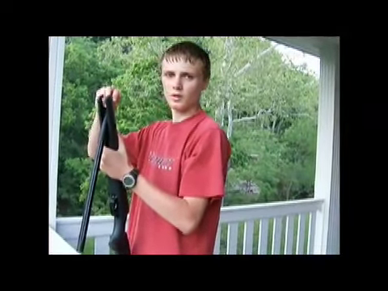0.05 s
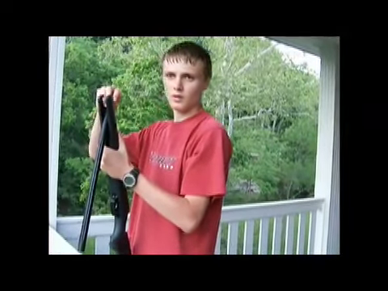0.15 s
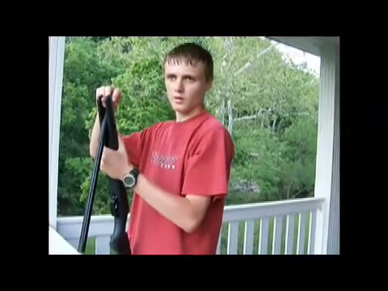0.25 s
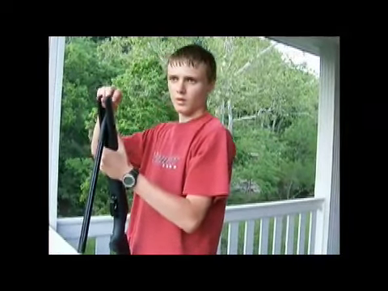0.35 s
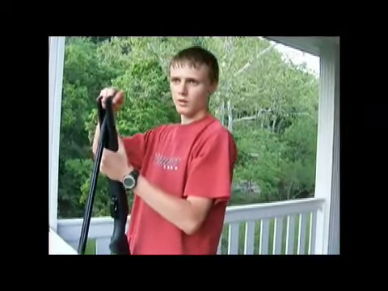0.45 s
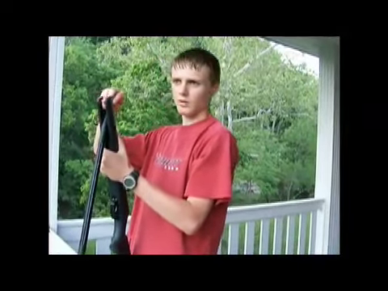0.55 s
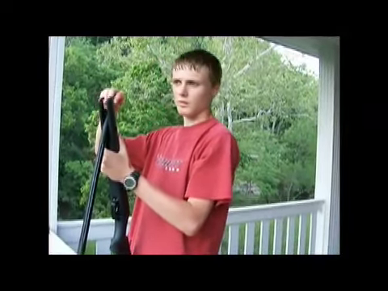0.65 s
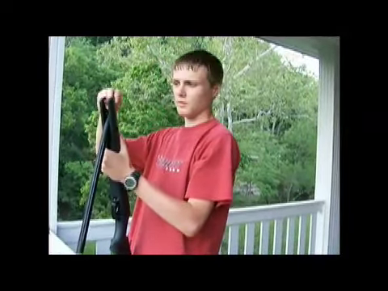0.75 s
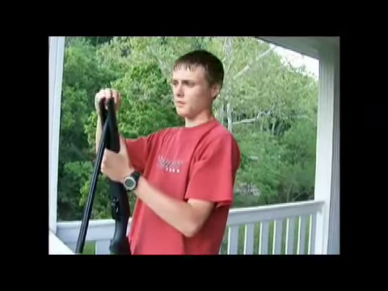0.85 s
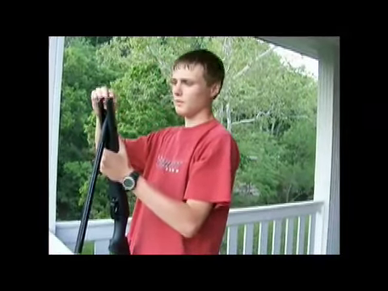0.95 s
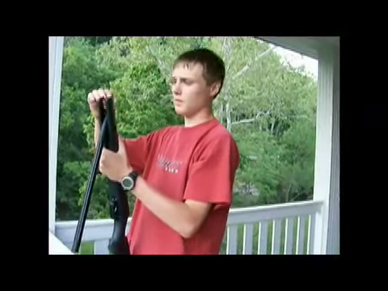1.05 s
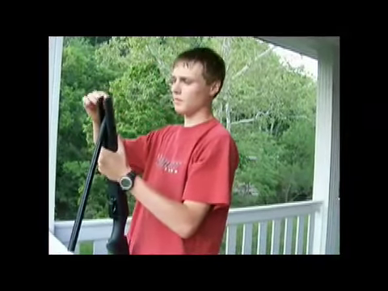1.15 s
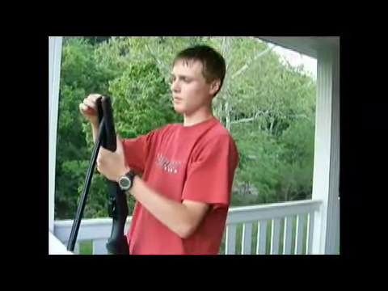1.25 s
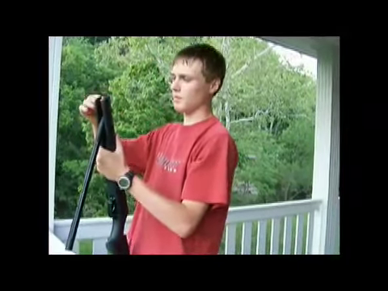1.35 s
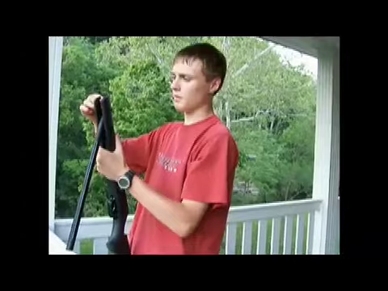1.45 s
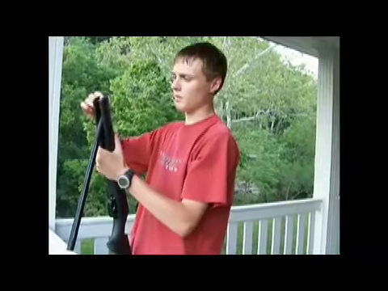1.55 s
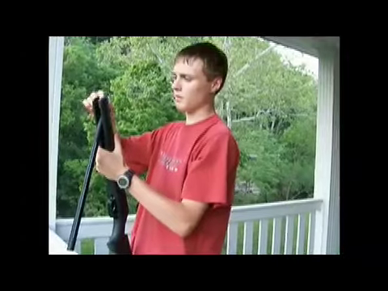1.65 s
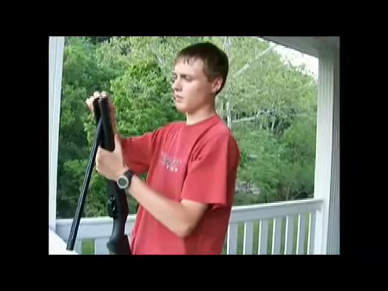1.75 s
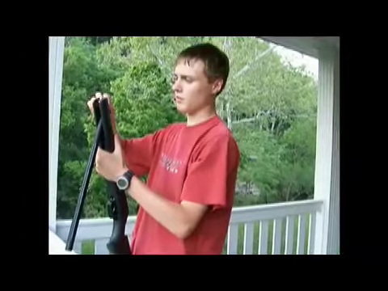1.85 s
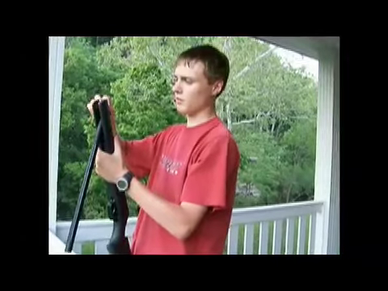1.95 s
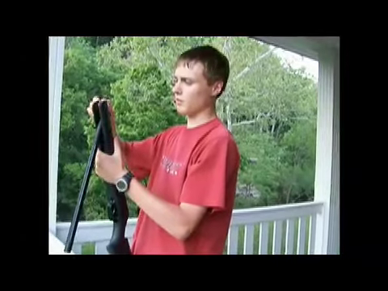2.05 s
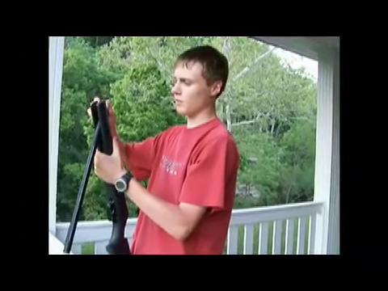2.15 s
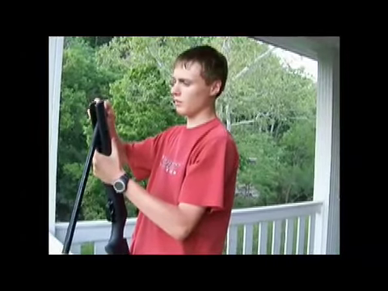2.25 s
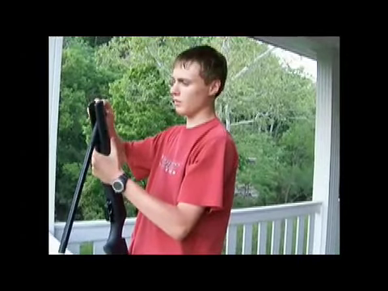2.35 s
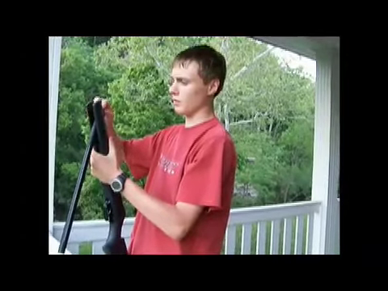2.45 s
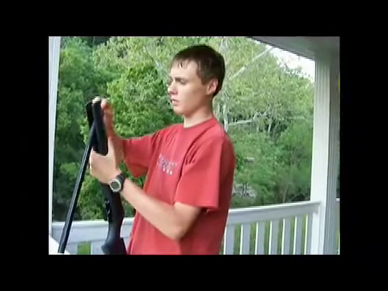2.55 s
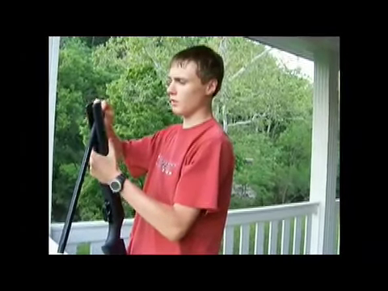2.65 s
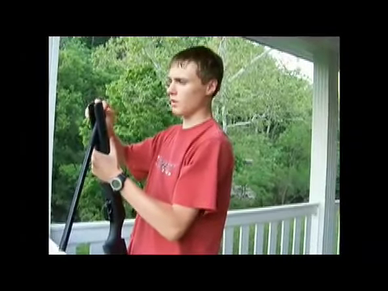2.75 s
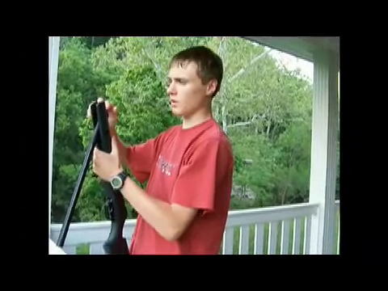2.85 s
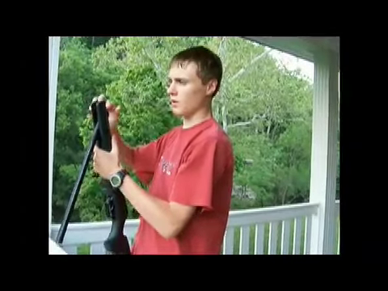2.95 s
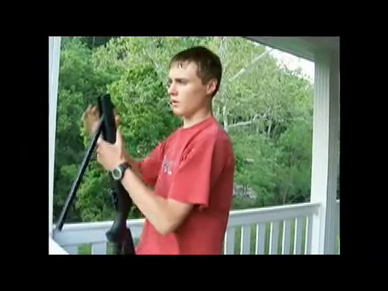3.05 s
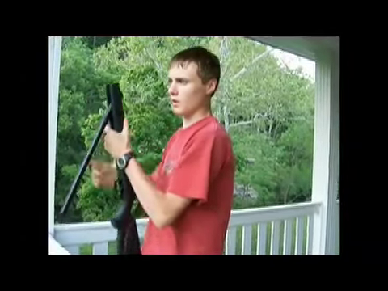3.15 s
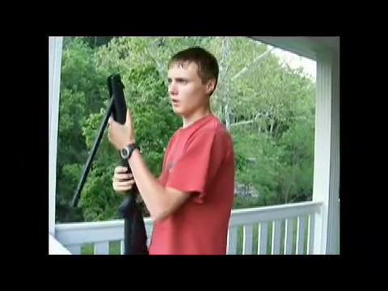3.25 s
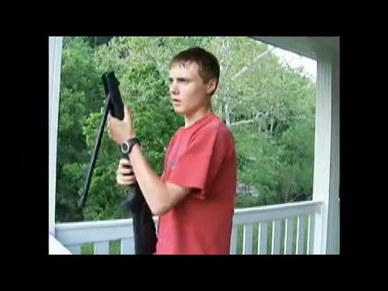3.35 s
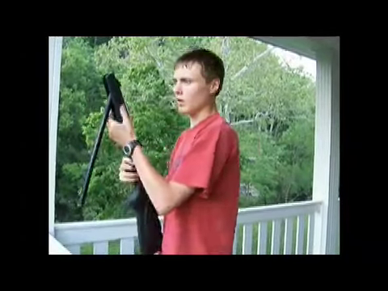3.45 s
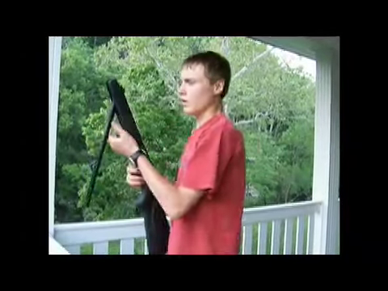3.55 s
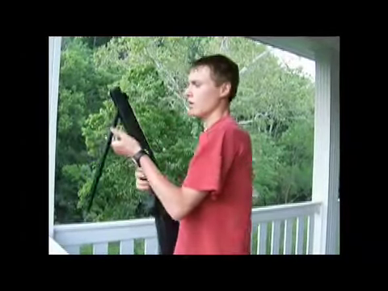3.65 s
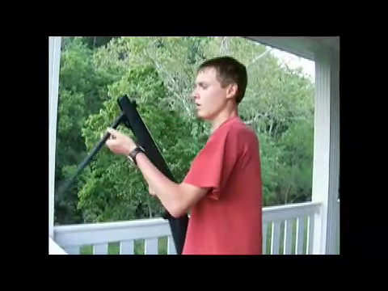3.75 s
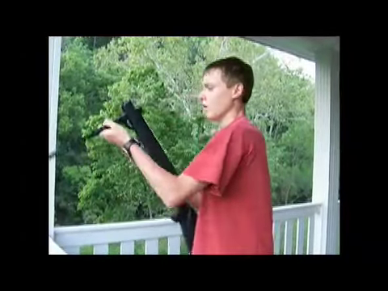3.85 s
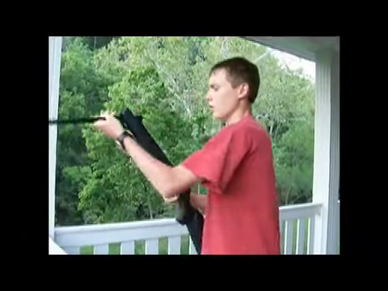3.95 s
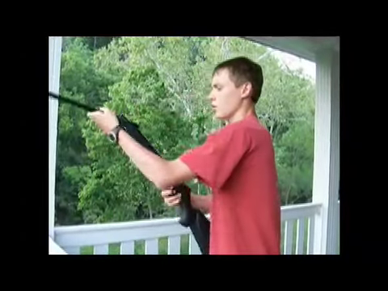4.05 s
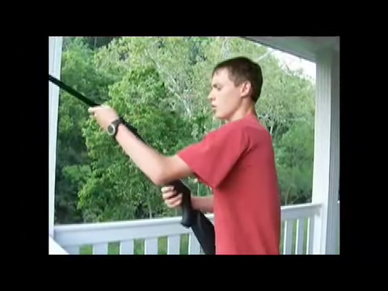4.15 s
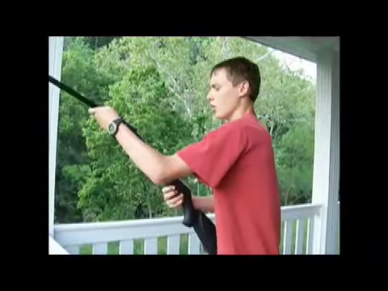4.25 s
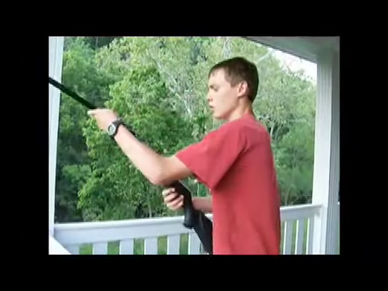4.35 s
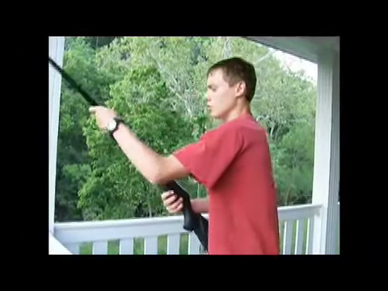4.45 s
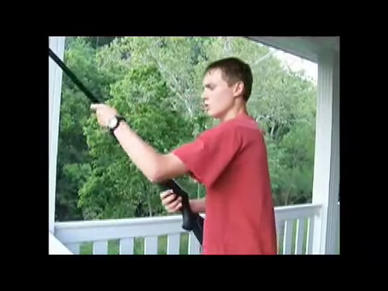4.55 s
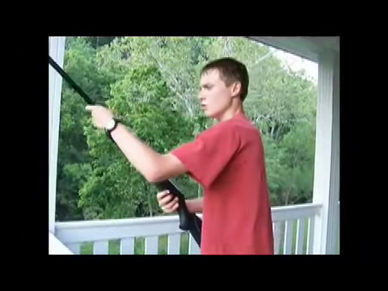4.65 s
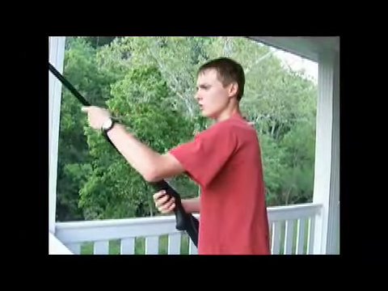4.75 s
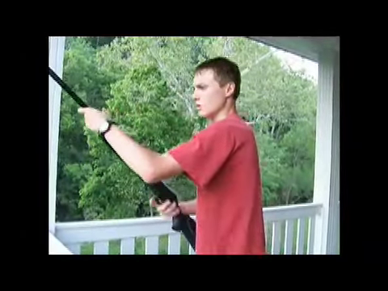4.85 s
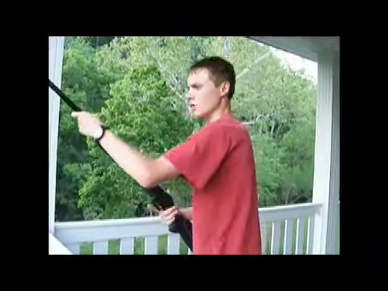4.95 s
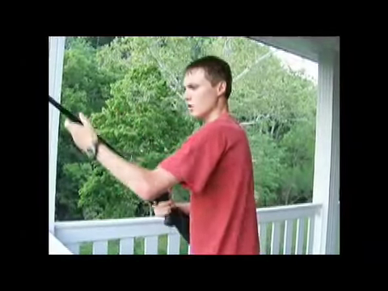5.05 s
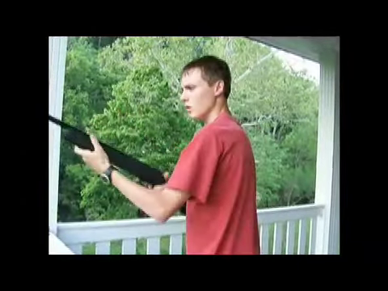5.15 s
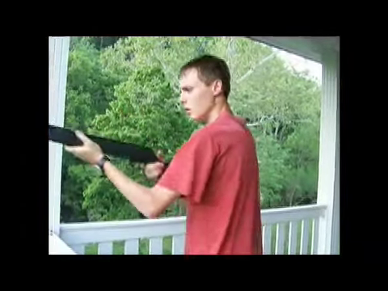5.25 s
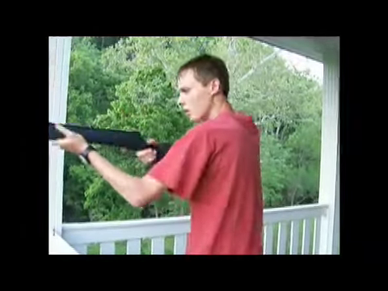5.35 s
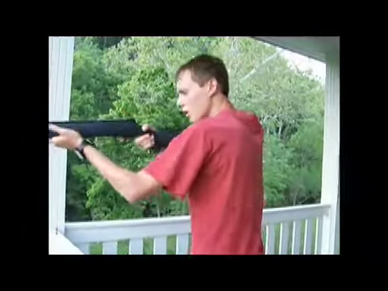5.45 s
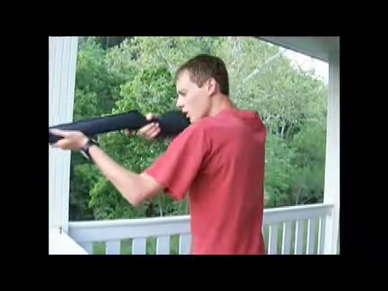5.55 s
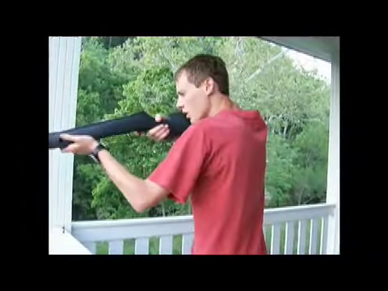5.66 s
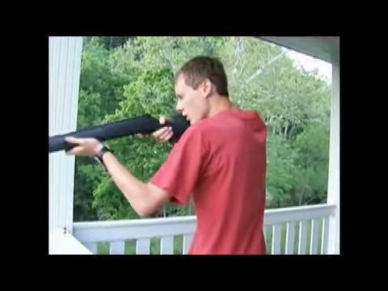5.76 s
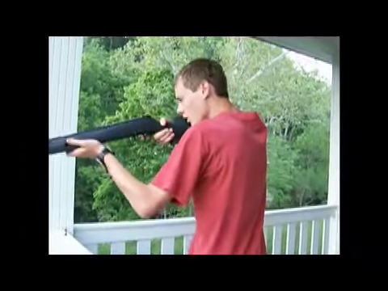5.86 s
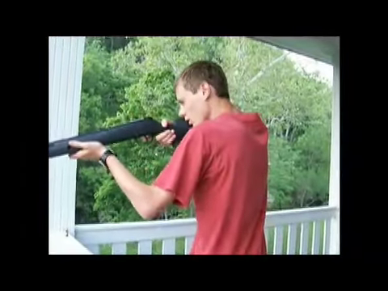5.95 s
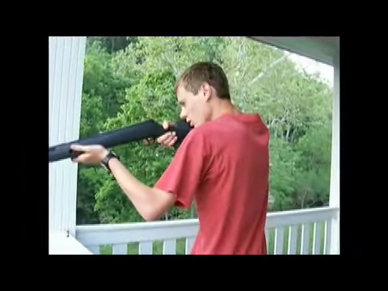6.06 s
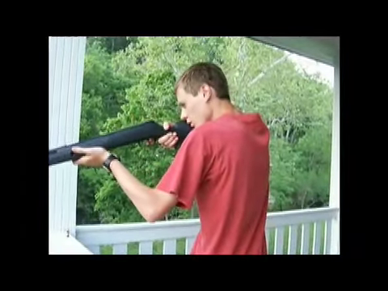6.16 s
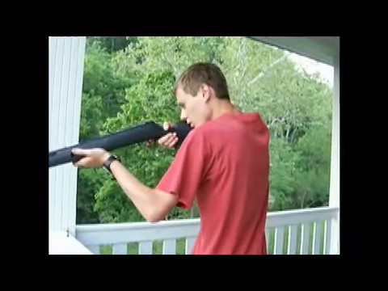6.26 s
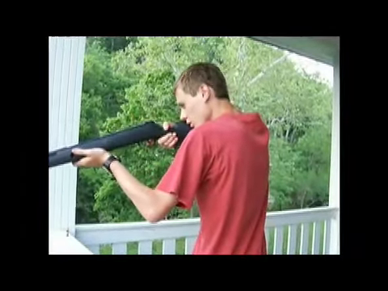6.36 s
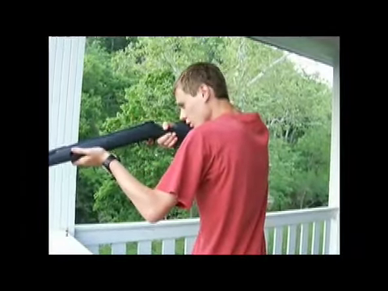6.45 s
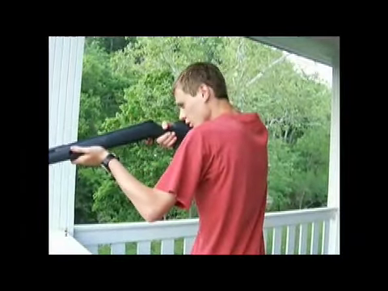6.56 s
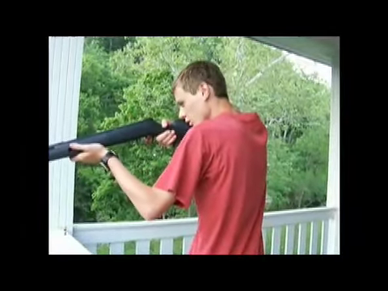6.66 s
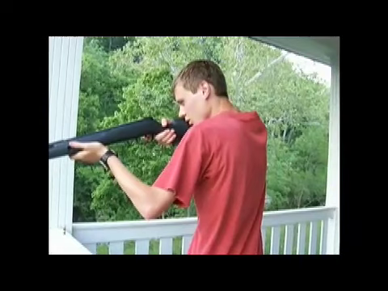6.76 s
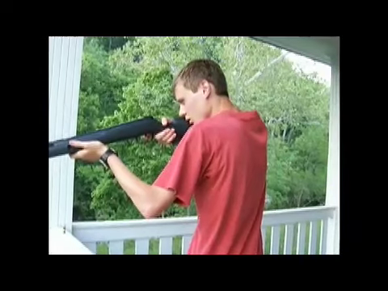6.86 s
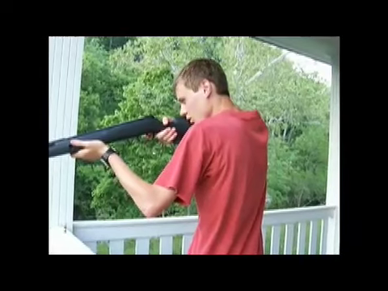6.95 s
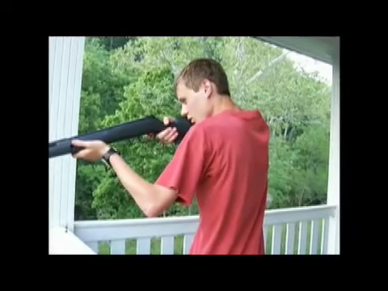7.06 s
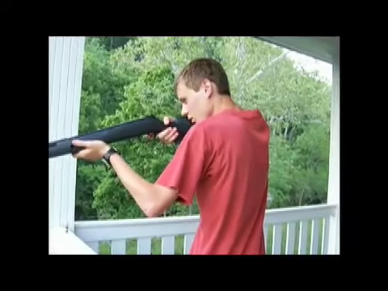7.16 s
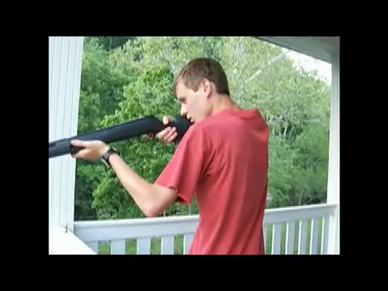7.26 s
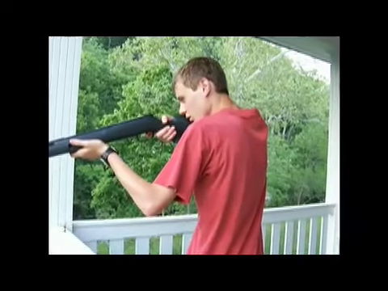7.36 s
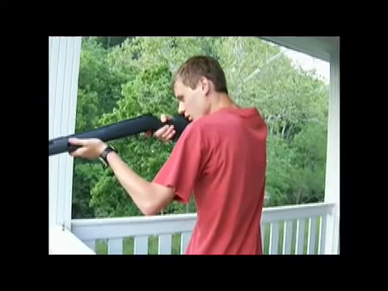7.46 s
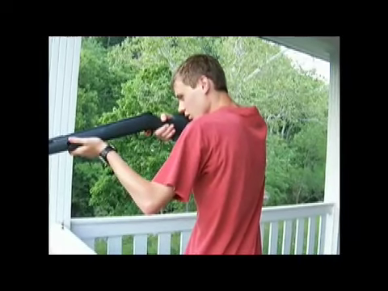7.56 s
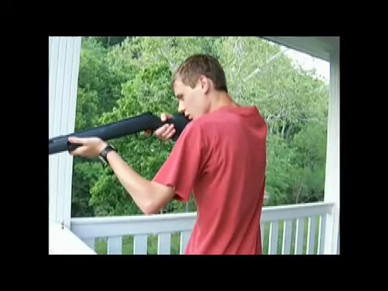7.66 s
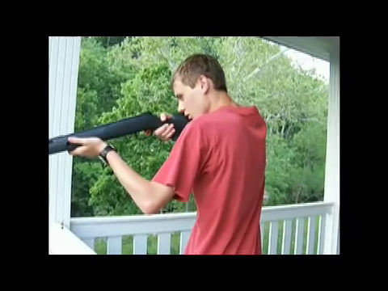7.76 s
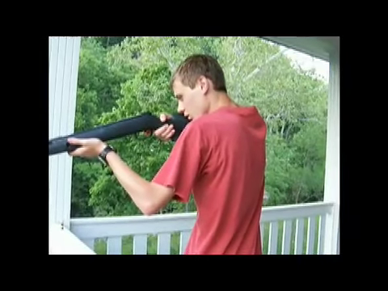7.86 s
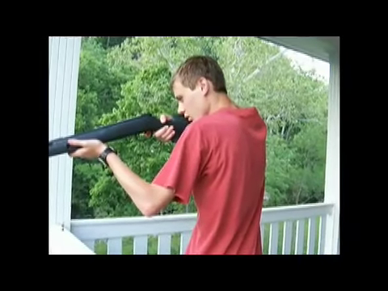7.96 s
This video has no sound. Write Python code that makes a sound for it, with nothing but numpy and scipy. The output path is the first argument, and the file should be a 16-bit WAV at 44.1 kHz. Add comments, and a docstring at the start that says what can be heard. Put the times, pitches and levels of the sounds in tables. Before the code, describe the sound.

A quiet leafy porch, heard by a small stereo microphone near the rifle: far traffic rumble, leaf hiss, a wavering low motor drone slowly sinking, faint hum and thin whines. A blurred bird whistle opens; an insect chirrs about three times a second, in bouts until 3.6 s. Light steel ticks come at 0.9 and 1.6-1.9 s, with soft hand rubbing. Firmer clacks fall at 2.9 and 3.0 s, with a dull stock knock. From 3.5 to 3.9 s, knocks, crowded clicks and rough steel grinding make a rattling cocking stroke; a shorter scrape follows at 4.0. At 4.4 s a huge, dry metallic snap overloads, leaving a bright spring shiver under half a second. The background ducks, with faint ticks, a shirt rustle and knock at 5.0 and soft wind buffets around 5-6. It recovers from about 6 s; chirring returns at 6.6, with bird whistles, clearest at the end.

```python
"""Air rifle on a porch

A break-barrel air rifle is loaded, cocked and snapped shut on a porch among trees.
Steel parts click (short noise cracks and ringing tones) and grind; hand and shirt rub (tiny random slips).
An insect chirrs (narrow noise) and birds whistle (gliding sines). Far traffic, leaves and wind are filtered
noise; a motor and a hum are wavering tones, with faint whines.
The snap makes the recorder's gain control duck everything for about two seconds."""
import sys
import numpy as np
from scipy import signal
from scipy.fft import rfft, irfft, next_fast_len
from scipy.io import wavfile
from scipy.ndimage import uniform_filter1d, minimum_filter1d

SR = 44100
rng = np.random.default_rng(int(sys.argv[2]) if len(sys.argv) > 2 else 0)


def bounce(signal):
    """Save signal as a 16-bit WAV file at the path given by the first command-line argument."""
    frames = np.transpose(np.atleast_2d(signal))
    limited = np.clip(frames, -1, 1)
    pcm = np.round(limited * 32767).astype(np.int16)
    wavfile.write(sys.argv[1], SR, pcm)


N = 352623   # length of the scene in samples
TIME = np.arange(N) / SR
SIZE = next_fast_len(N + SR, True)   # filtering length, with a spare second so that nothing wraps round
BINS_HZ = np.maximum(np.arange(SIZE // 2 + 1) * SR / SIZE, 1)


def from_db(db):
    """Turn decibels into a gain."""
    return 10 ** (np.asarray(db) / 20)


def rms_one(x):
    """Scale to an average strength (rms) of 1."""
    return x / np.sqrt(np.mean(x ** 2) + 1e-20)


def level(rows):
    """Gain over time, gliding between (time [s], level [dB]) points."""
    return from_db(np.interp(TIME, *np.transpose(rows)))


def swells(rows):
    """Gain over time from bell-shaped swells: (middle [s], half length [s], level [dB])."""
    gain = np.zeros(N)
    for middle, half_length, db in rows:
        edges = [middle - 4 * half_length, middle + 4 * half_length]
        near = slice(*np.searchsorted(TIME, edges))
        gain[near] += from_db(db) * np.exp(-np.square((TIME[near] - middle) / half_length))
    return gain


def drift(width_hz):
    """Random wandering, mostly slower than this rate; rms 1."""
    count = 2 ** 14   # coarse points, later joined by straight lines
    hz = np.arange(count // 2 + 1) * SR / N
    slow = irfft(rfft(rng.standard_normal(count)) / (1 + (hz / width_hz) ** 2))
    return np.interp(np.arange(N) * count / N, np.arange(count), rms_one(slow))


def over_hz(rows):
    """Spread each column of a frequency table over all frequencies, evenly in pitch."""
    hz, *columns = np.transpose(rows)
    return [np.interp(np.log(BINS_HZ), np.log(hz), column) for column in columns]


def causal(gain):
    """Minimum-phase filter with these gains: nothing sounds before its cause."""
    cepstrum = irfft(np.log(gain), SIZE)
    # Fold the second half of the cepstrum onto the first.
    fold = (1 + np.sign(np.arange(SIZE))) * (np.arange(SIZE) < SIZE // 2)
    return np.exp(rfft(cepstrum * fold))


def colour(spectrum):
    """Causal filter with this spectrum and an average power gain of 1."""
    return causal(rms_one(from_db(over_hz(spectrum)[0])))


def filtered(x, response):
    """Apply a frequency response."""
    return irfft(rfft(x, SIZE) * response, SIZE)[..., :N]


def narrow_noise(hz, width_hz):
    """Noise gathered round one frequency; rms 1."""
    gain = 1 / (1 + ((BINS_HZ - hz) / width_hz) ** 2)
    return rms_one(filtered(rng.standard_normal(SIZE), gain))


def whistle(hz):
    """A sine that follows a pitch curve."""
    return np.sin(2 * np.pi * np.cumsum(hz) / SR)


def wavering_tone(hz, wander_hz, waver_db):
    """A tone whose pitch and level wander; rms 1."""
    tone = whistle(hz + wander_hz * drift(11.8))
    return rms_one(tone * from_db(waver_db * drift(5.4)))


def friction(slips_per_s, spread_db, smooth_share):
    """Rubbing surfaces: tiny slips of uneven size over a smooth hiss; rms 1."""
    slips = (rng.random(N) < slips_per_s / SR) * rng.choice([-1, 1], N)
    sizes = from_db(spread_db * np.minimum(rng.exponential(1, N), 3))
    return rms_one(rms_one(slips * sizes) + smooth_share * rng.standard_normal(N))


def struck(modes, spread_db):
    """A blow sets off fading tones, each with a random strength."""
    t = TIME[:SR // 2]
    strengths = from_db(spread_db * rng.standard_normal(len(modes)))
    strengths = strengths * rng.choice([-1, 1], len(modes))
    return sum(strength * from_db(db - 60 * t / t60) * np.sin(2 * np.pi * hz * t)
               for strength, (hz, db, t60) in zip(strengths, modes))


def add(track, s, sound):
    """Mix a sound into a track at a time in seconds."""
    start = int(np.clip(round(s * SR), 0, N))
    track[start:start + len(sound)] += sound[:N - start]


def tail(x, t60, low_hz):
    """Dense scattered reflections, different on each side and thin in the bass."""
    t = TIME[:SR]
    fading = from_db(-60 * t / t60) * np.minimum(t / .008, 1)   # builds up over 8 ms
    response = rms_one(rng.standard_normal((2, SR)) * fading) / np.sqrt(SR)
    bass_cut = BINS_HZ / (BINS_HZ - 1j * low_hz)
    return filtered(x, rfft(response, SIZE) * bass_cut)


def diffuse(spectrum):
    """Stereo noise from all around, more alike in both channels in the bass."""
    # left-right likeness of the surroundings: (frequency [Hz], likeness [0-1])
    likeness = [(25, .4), (70, .88), (160, .97), (500, .82), (1000, .72), (1800, .56), (2500, .18),
                (6000, .2)]
    alike = np.clip(over_hz(likeness)[0], 0, 1)
    shares = np.sqrt([(1 + alike) / 2, (1 - alike) / 2])
    mid, side = filtered(rng.standard_normal((2, N)), colour(spectrum) * shares)
    return np.array([mid + side, mid - side])


def traffic():
    """Far traffic: a rumble of low noise from all around."""
    # (time [s], level [dB])
    traffic_level = [(0, -36), (0.7, -34), (1.5, -36), (4.5, -39.5), (8, -37)]
    # (frequency [Hz], level per Hz [dB])
    traffic_spectrum = [(10, -6), (25, -3), (45, -6), (80, -2), (130, 0), (190, -0.5), (260, -3), (330, -9),
                        (480, -12.5), (1000, -37.5), (4000, -44.5), (9000, -69)]
    return level(traffic_level) * diffuse(traffic_spectrum)


def leaves():
    """Leaves and air: a hiss from all around."""
    # (time [s], level [dB])
    air_level = [(0, -38.5), (1.3, -37.5), (2.6, -40), (3.5, -36.5), (4.5, -40), (6.7, -37.5), (7.4, -39.5)]
    # (frequency [Hz], level per Hz [dB])
    air_spectrum = [(60, 2), (400, 0), (600, 2.5), (820, 4), (1150, -0.5), (1500, -3.5), (2000, -8),
                    (2800, -8.5), (3500, -13.5), (4300, -14), (5000, -9.5), (6200, -17.5), (7300, -16),
                    (9000, -47)]
    return level(air_level) * diffuse(air_spectrum)


def motor():
    """A far motor slowly loses speed; its wavering tones share one falling pitch curve."""
    # main tone: (time [s], pitch [Hz], level [dB])
    drone_path = [(0, 169, -38.5), (0.45, 165, -42), (0.7, 165, -39), (1.05, 164, -46), (1.3, 164, -32),
                  (1.5, 162, -36.5), (2.15, 161, -33.5), (2.36, 159, -45), (2.95, 160, -33),
                  (3.22, 161, -46.5), (3.4, 160, -38), (3.8, 160, -35.5), (4.4, 157, -43), (5.1, 157, -38),
                  (5.8, 155, -40), (7.15, 156, -39), (8, 153, -46.5)]
    # tones: (pitch ratio to the main tone, level against it [dB], pitch wander [Hz])
    motor_tones = [(0.785, -10.5, 3.5), (1, 0, 1.22), (1.57, -12, 5)]
    drone_s, drone_hz, drone_db = np.transpose(drone_path)
    pitch = np.interp(TIME, drone_s, drone_hz)
    tones = sum(from_db(db) * wavering_tone(ratio * pitch, wander, waver_db=2.5)
                for ratio, db, wander in motor_tones)
    return from_db(np.interp(TIME, drone_s, drone_db)) * tones


def hum():
    """A low hum of steady pitch: a tone and a weaker one an octave above."""
    hum_hz, octave_db = 99.76, -6
    # (time [s], level [dB])
    hum_level = [(0, -46.5), (1.45, -40), (2.2, -51.5), (3.35, -41.5), (4.2, -50.5), (5.3, -51.5),
                 (6.1, -41), (7.1, -45.5)]
    low = wavering_tone(hum_hz, .4, waver_db=0.0)
    octave = wavering_tone(2 * hum_hz, .8, waver_db=1.5)
    return level(hum_level) * (low + from_db(octave_db) * octave)


def whines():
    """Thin whines: steady narrow noises, and one tone that swells and fades."""
    # steady whines: (frequency [Hz], level [dB], width [Hz])
    steady_whines = [(738.5, -52, 4.4), (840, -63, 4.1), (5860, -67, 17), (5980, -71.5, 20),
                     (5850, -67.5, 15)]
    # swells of the tone: (middle [s], half length [s], level [dB])
    whine_swells = [(0.95, 0.5, -44.5), (6.7, .2, -48), (7.8, 0.51, -52)]
    steady = sum(from_db(db) * narrow_noise(hz, width) for hz, db, width in steady_whines)
    return steady + swells(whine_swells) * wavering_tone(831, 1.1, waver_db=-1.5)


def breeze():
    """Wind on the microphone: each port catches its own eddies of low noise, the right one more."""
    calm_db, gust_half_length_s = -49.5, 0.11
    # gusts: (time [s], level [dB])
    gusts = [(1.8, -45.5), (3.8, -38.5), (5.05, -33), (5.25, -38), (5.681, -31.5), (5.87, -30.5),
             (6.27, -37)]
    # (frequency [Hz], level per Hz [dB])
    wind_spectrum = [(10, -13.5), (28, 5.5), (55, -4.5), (90, -8.5), (160, -14.5), (400, -49)]
    strength = from_db(calm_db) + swells([(s, gust_half_length_s, db) for s, db in gusts])
    eddies = filtered(rng.standard_normal((2, N)), colour(wind_spectrum))
    return strength * eddies * from_db([[-7], [1]])


def surroundings():
    """The background layers simply add up."""
    return traffic() + leaves() + motor() + hum() + whines() + breeze()


def birds():
    """Gliding whistles and chips, some purer, some blurred by random flutter, scattered by the trees."""
    # (start [s], length [s], first pitch [Hz], last pitch [Hz], level [dB], flutter [Hz])
    bird_calls = [(0.0, 0.23, 3115, 2900, -47, 210), (0.901, 0.021, 5700, 6460, -47.5, 60),
                  (0.997, 0.023, 6000, 5320, -43, 60), (1.408, 0.041, 6530, 5670, -49.5, 120),
                  (1.509, 0.031, 5940, 5430, -45, 90), (2.063, 0.13, 7320, 7200, -50.5, 40),
                  (2.17, 0.13, 7130, 6950, -51, 90), (2.23, 0.21, 6770, 6820, -50, 80),
                  (2.557, 0.21, 6940, 6800, -52, 60), (4.16, 0.032, 2680, 2430, -48.5, 15),
                  (4.246, 0.064, 2920, 3400, -49, 3), (4.3315, .004, 5200, 2800, -34.5, 10),
                  (5.14, 0.16, 7150, 7170, -49, 20), (5.367, 0.029, 2950, 2900, -48, 15),
                  (5.54, 0.1, 7110, 7060, -44.5, 10), (5.925, 0.31, 5720, 5740, -48.5, 20),
                  (5.95, 0.12, 7100, 6960, -55, 15), (6.07, .13, 4620, 4550, -49.5, 18),
                  (6.334, 0.045, 2834, 2764, -51, 15), (6.379, 0.0093, 7160, 6220, -46, 30),
                  (6.645, 0.035, 2670, 2330, -48, 25), (6.693, 0.08, 3120, 3050, -47, 69),
                  (7.04, 0.02, 3030, 2850, -47.5, 15), (7.065, 0.03, 2600, 2310, -45.5, 15),
                  (7.246, 0.05, 2760, 2230, -42, 20), (7.504, 0.13, 2904, 2750, -47.5, 11),
                  (7.632, 0.14, 2795, 2773, -44.5, 3.7), (7.774, 0.075, 2890, 2750, -47, 11),
                  (7.802, .014, 4070, 3820, -49, 10), (7.83, 0.11, 2750, 2750, -35, 2)]
    song, flutter = np.zeros(N), drift(110)
    for s, length, first_hz, last_hz, db, flutter_hz in bird_calls:
        along = np.linspace(0, 1, max(int(length * SR), 2))   # 0 at the start of the call, 1 at its end
        glide = first_hz + (last_hz - first_hz) * along
        hz = glide + flutter_hz * np.interp(s + along * length, TIME, flutter)
        swell = np.sin(np.pi * along).clip(0) ** .4
        add(song, s, from_db(db) * swell * whistle(hz))
    song = song * from_db(1.5 * drift(35))
    return from_db(1.0) * song + from_db(-0.5) * tail(song, t60=0.48, low_hz=500)


def insect():
    """Bursts of fast wing strokes in one narrow band, about three a second while a bout lasts."""
    period_s, half_length_s = 0.3456, .074
    stroke_hz, stroke_depth = 62, .25
    # bouts of evenly spaced chirrs: (first chirr [s], about the last chirr [s], level [dB])
    bouts = [(0.071, 0.4, -50), (1.212, 2.22, -50.5), (2.555, 3.58, -50), (6.59, 7.95, -48.5)]
    swell = np.zeros(N)
    for first, last, db in bouts:
        for k in range(round((last - first) / period_s) + 1):
            from_middle = (TIME - (first + k * period_s)) / half_length_s
            swell += from_db(db) / (1 + np.square(np.square(from_middle)))
    strokes = 1 + stroke_depth * np.sin(2 * np.pi * stroke_hz * TIME + drift(5))
    left_and_right = np.array([narrow_noise(4720, 170), narrow_noise(4700, 260)])
    return swell * strokes * left_and_right


def handling():
    """The cocking lever grinds in strokes; with each arm movement a hand rubs and the shirt rustles."""
    # arm movements: (middle [s], half length [s], hand level [dB], shirt level [dB])
    moves = [(1.01, 0.14, -52, -64), (1.48, 0.11, -57, -67.5), (1.758, 0.2, -54, -62),
             (2.843, 0.82, -50, -58), (3.342, 0.076, -46, -47.5), (3.71, 0.16, -62, -35),
             (4.296, 0.18, -59, -36), (4.72, 0.27, -48.5, -45), (5.032, 0.057, -41.5, -36.5),
             (7.86, 0.15, -49.5, -46.5)]
    # steel sliding on steel as the barrel is levered: (peak [s], level [dB], rise time [s], fall time [s])
    lever_strokes = [(3.54, -38, 0.015, 0.03), (3.66, -39.5, 0.012, 0.022), (3.767, -22.5, 0.032, 0.07),
                     (4.037, -31, 0.031, 0.068)]
    # spectra of hand, shirt and steel: (frequency [Hz], level per Hz [dB])
    skin_spectrum = [(200, -12.5), (1200, -3.5), (2500, -2), (4000, 0), (6000, 4.5), (7200, -12),
                     (9000, -41)]
    shirt_spectrum = [(30, -5.5), (130, 17), (280, -6), (500, 7), (1000, 0.5), (1600, -12.5), (3000, -20.5),
                      (7500, -31.5), (9000, -53.5)]
    scrape_spectrum = [(60, -13.5), (250, 1.5), (900, 2.5), (2000, -8), (2700, 0), (3400, -2), (4300, -1.5),
                       (5200, 3), (6400, -5), (7500, -17.5), (9000, -45.5)]

    rub = swells([(s, half, db) for s, half, db, _ in moves]) * from_db(3.0 * drift(25))
    rub = rub * friction(slips_per_s=1500, spread_db=5.5, smooth_share=1.0)
    cloth = swells([(s, half, db) for s, half, _, db in moves])
    # The negative spread makes some slips smaller instead of larger.
    cloth = cloth * friction(slips_per_s=2000, spread_db=-2.5, smooth_share=0.67)
    effort = sum(from_db(db) * np.exp(-abs(TIME - s) / np.where(TIME < s, rise, fall))
                 for s, db, rise, fall in lever_strokes)
    grind = effort * friction(slips_per_s=2200, spread_db=1.5, smooth_share=.6)
    grind = grind * from_db(1.5 * drift(110))   # a rough, uneven level
    layers = [(rub, skin_spectrum), (cloth, shirt_spectrum), (grind, scrape_spectrum)]
    return sum(filtered(x, colour(spectrum)) for x, spectrum in layers)


def contacts():
    """Each contact is a double crack, coloured by the part hit, that rings the steel; the stock knocks dully."""
    crack_decay_s = 0.0024
    part_q, part_db = 7.4, 2   # the part hit rings briefly at its own pitch
    # steel contacts, a touch and a rebound: (time [s], crack level [dB], ringing level [dB],
    # rebound level against the touch [dB], rebound delay [s], pitch of the part hit [Hz])
    clicks = [(0.873, -37, -66, -2.5, 0.0029, 6000), (1.555, -45, -51, -3, 0.0033, 2500),
              (1.68, -49, -56.5, -3, .006, 2600), (1.748, -35.5, -65, -3.5, 0.0042, 3900),
              (1.883, -49, -60, -6, 0.0055, 5900), (1.9462, -25, -56, 4, 0.0051, 6340),
              (2.8621, -27.5, -54, -5.5, 0.0045, 6150), (2.9986, -16, -33.5, -3.5, 0.0042, 1830),
              (3.066, -41, -58, -9, 0.0036, 5200), (3.5481, -16.5, -54, -2.5, 0.0037, 2390),
              (3.628, -34, -61.5, -6, 0.0036, 5000), (3.6538, -30, -49.5, -2, 0.0033, 6000),
              (3.672, -16, -42, -5, 0.0064, 2670), (3.7163, -27.5, -49, -4, .004, 4900),
              (3.736, -13.5, -48, -3.5, .004, 2700), (3.7461, -19, -48, -7, 0.0044, 6200),
              (3.7568, -19.5, -50, 0.5, 0.0043, 6200), (3.7699, -16, -47, 0.5, .004, 2700),
              (3.778, -23, -48, 0, .004, 5000), (3.786, -20.5, -51, -3, .004, 6200),
              (3.8125, -26, -51, -6.5, 0.0034, 2700), (3.8299, -18, -49, -3, 0.0037, 4000),
              (3.8432, -12, -47, -8, .005, 4960), (3.879, -30, -40, -4, 0.004, 6000),
              (4.403, 4.5, -53, -1, 0.0034, 5900), (4.636, -45, -56, -4, .004, 5400),
              (4.6843, -31.5, -53, -6, 0.0042, 5470), (4.808, -36, -52, -4, .004, 6100),
              (4.862, -38, -57, -6, .004, 5200)]
    # barrel and spring tones: (frequency [Hz], level [dB], time to fade by 60 dB [s])
    steel_modes = [(1800, -9.5, 0.052), (2230, -1.5, 0.049), (2800, -13.5, .06), (3640, -12.5, .06),
                   (3990, -6.5, 0.073), (4530, 0, 0.11), (4800, -5, 0.34), (5100, 2, 0.27),
                   (5190, -3, 0.34), (5560, 0, 0.29), (5800, -9, 0.24), (6150, -10.5, 0.16),
                   (6630, -6, .15), (7100, -5.5, .12)]
    # dull knocks on the stock: (time [s], level [dB])
    stock_knocks = [(1.812, -44.5), (3.002, -27), (3.028, -30), (3.515, -24.5), (3.53, -19.5),
                    (4.405, -31.5), (4.999, -25.5)]
    # stock tones: (frequency [Hz], level [dB], time to fade by 60 dB [s])
    stock_modes = [(245, -7, 0.069), (320, -5, 0.083), (381, -1, 0.08)]
    # (frequency [Hz], level per Hz [dB])
    crack_spectrum = [(60, -11), (200, -9.5), (700, -5.5), (1300, -3), (1900, -3), (2600, -3), (3300, -4.5),
                      (4300, 2.5), (5200, 5.5), (6500, 0.5), (7500, 5), (9000, -0.5), (12000, -11.5),
                      (16000, -30)]

    cracks, rings, knocks = np.zeros(N), np.zeros(N), np.zeros(N)
    t = TIME[:SR // 20]
    for s, crack_db, ring_db, rebound_db, rebound_s, part_hz in clicks:
        part = signal.iirpeak(part_hz, part_q, fs=SR)
        for at, db in [(s, crack_db), (s + rebound_s, crack_db + rebound_db)]:
            burst = from_db(db) * rng.choice([-1, 1], len(t)) * np.exp(-t / crack_decay_s)
            add(cracks, at, burst + from_db(part_db) * signal.lfilter(*part, burst))
        add(rings, s, from_db(ring_db) * struck(steel_modes, spread_db=4.0))
    for s, db in stock_knocks:
        add(knocks, s, from_db(db) * struck(stock_modes, spread_db=2.5))
    # The loose spring buzzes against its tube, which blurs the ring.
    buzz = .2 + drift(220)
    return filtered(cracks, colour(crack_spectrum)) + rings * buzz + knocks


def spring():
    """The snap leaves the mainspring's coils chattering in their tube, a bright hiss that dies away evenly."""
    # (start [s], level [dB], time to fade by 60 dB [s])
    shiver = (4.409, -26, .35)
    # (frequency [Hz], level per Hz [dB])
    coil_spectrum = [(500, -27), (2000, -10), (3200, -7), (4200, -4), (4900, -7), (5700, 1), (6600, -0.5),
                     (7500, 0), (9000, -23)]
    s, db, t60 = shiver
    dying = from_db(db - 60 * np.maximum(TIME - s, 0) / t60) * (TIME >= s)
    chatter = dying * friction(slips_per_s=3000, spread_db=5.0, smooth_share=.8)
    return filtered(chatter, colour(coil_spectrum))


def porch(x):
    """Nearby surfaces return a few echoes, delayed differently on each side, and a short tail."""
    # (delay to the left port [s], delay to the right port [s], level [dB])
    surfaces = [(.0016, 0.0019, -17.5), (.0039, .0032, -8), (.0066, .0070, -22.5), (.0098, .0093, -17.5),
                (0.0351, 0.0355, -23.5)]
    echoes = np.zeros((2, N))
    for left_s, right_s, db in surfaces:
        sides = [np.interp(TIME - delay, TIME, x, left=0) for delay in (left_s, right_s)]
        echoes += from_db(db) * np.array(sides)
    return x + echoes + from_db(-12.0) * tail(x, t60=0.34, low_hz=1200)


def scene():
    """Everything reaches the microphone through two ports that resonate differently, the right one later."""
    right_lag_s = .00004
    # (frequency [Hz], left level [dB], right level [dB])
    ports = [(25, -5, 4), (129, 1.5, 0), (825, -0.5, -2), (2170, 1.5, 4), (2800, -0.5, 6), (3690, 3.5, 4.5),
             (4345, 2.5, 10), (4950, 7, 15.5), (5470, 10, 9.5), (6100, 15, 2.5), (6590, 9.5, -2),
             (7300, 3.5, -4.5), (8170, 0, -7)]
    rifle = porch(handling() + contacts() + spring())
    sound = surroundings() + birds() + insect() + rifle
    left, right = causal(from_db(over_hz(ports)))
    lag = np.exp(-2j * np.pi * BINS_HZ * right_lag_s)
    return filtered(sound, np.array([left, right * lag]))


def gain_control(x, threshold_db, range_db, attack_s, hold_s, release_s):
    """A loud peak pulls the gain down within a moment; it is held, then creeps back."""
    power = uniform_filter1d(np.mean(x ** 2, axis=0), size=220)   # averaged over 5 ms
    power_db = 10 * np.log10(np.maximum(power, 1e-12))
    excess = np.clip(power_db - threshold_db, 0, range_db)
    half = int(hold_s * SR / 2)
    held = -minimum_filter1d(-excess, 2 * half + 1, origin=half)   # largest excess within the hold time
    fade = np.exp(-TIME / release_s)
    released = np.maximum.accumulate(held / fade) * fade
    lag = np.exp(-1 / (attack_s * SR))
    cut_db = signal.lfilter([1 - lag], [1, -lag], released)
    return x * from_db(-cut_db)


def record(dry):
    """Gain control, overload, weakened treble, and overtones from the squeezed loudest peaks."""
    # A fixed weak share of all treble above the edge stays, heard mostly in sharp clicks.
    treble_edge_hz, treble_leak_db = 7010, -30.5
    ceiling, cutoff_hz = 1.3, 17800
    x = gain_control(dry, threshold_db=-3.0, range_db=13.5, attack_s=0.0018, hold_s=1.37, release_s=0.87)
    x = ceiling * np.tanh(x / ceiling)   # soft overload
    above = signal.sosfilt(signal.butter(6, treble_edge_hz, "high", fs=SR, output="sos"), x)
    below = signal.sosfilt(signal.butter(22, treble_edge_hz, fs=SR, output="sos"), x)
    x = below + from_db(treble_leak_db) * above
    peaks = x - np.clip(x, -.9, .8)   # uneven limits for the two directions of the wave
    squeezed = x - .7 * peaks
    return signal.sosfilt(signal.cheby2(12, 70, cutoff_hz, fs=SR, output="sos"), squeezed)


dry = scene()
out = record(dry)
bounce(out)
```